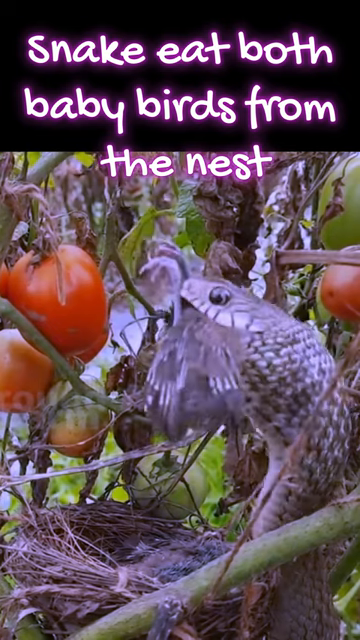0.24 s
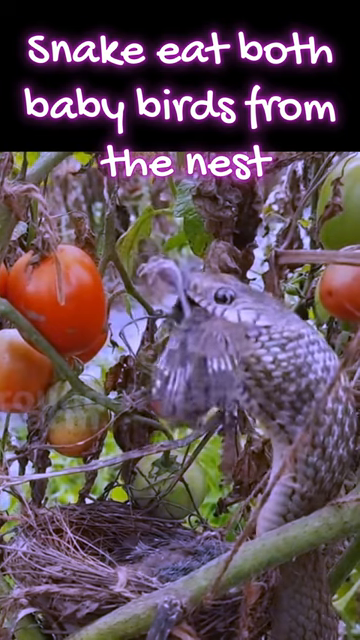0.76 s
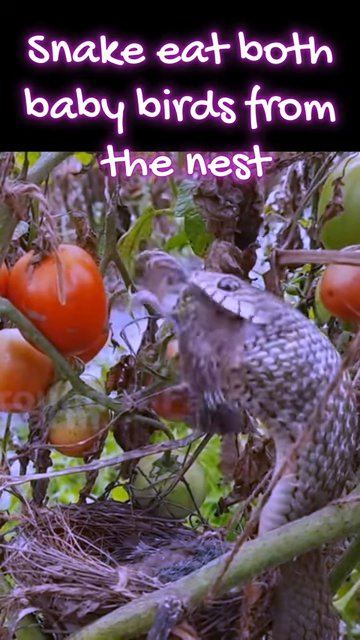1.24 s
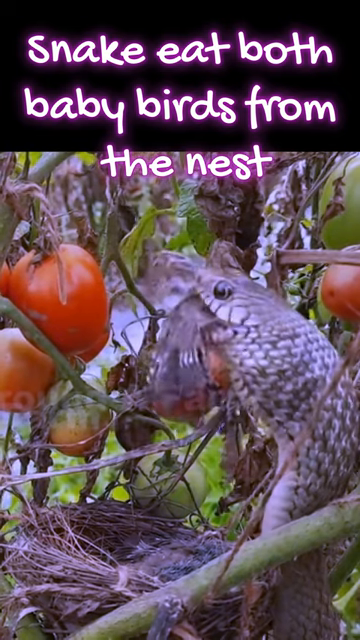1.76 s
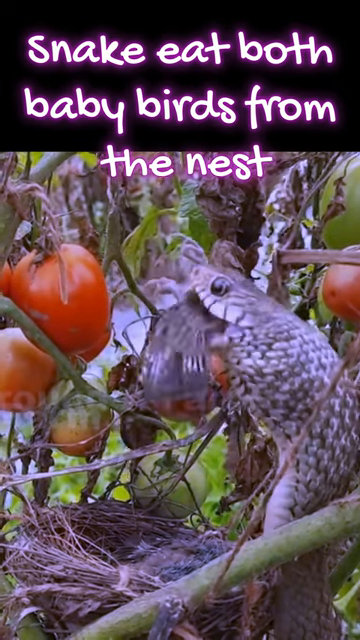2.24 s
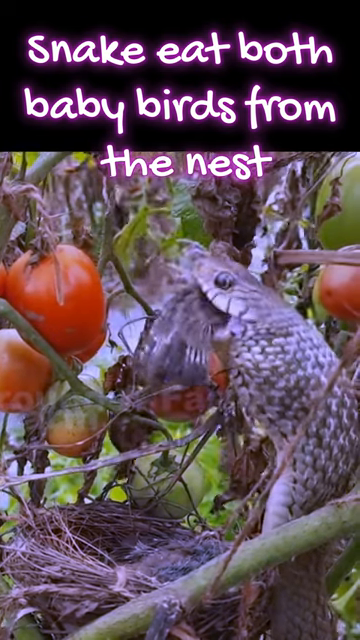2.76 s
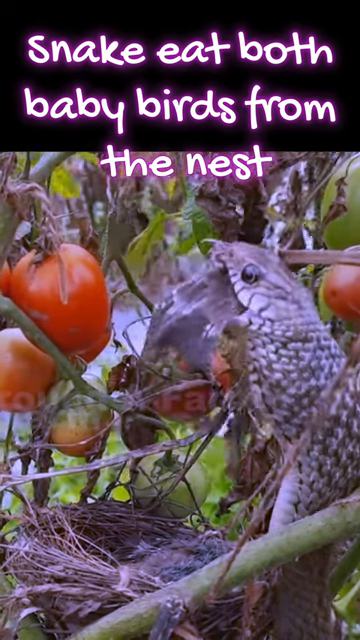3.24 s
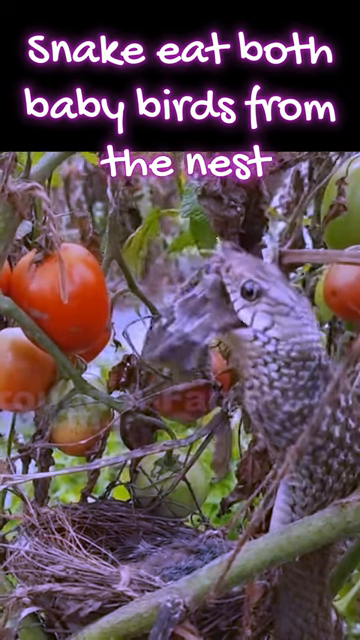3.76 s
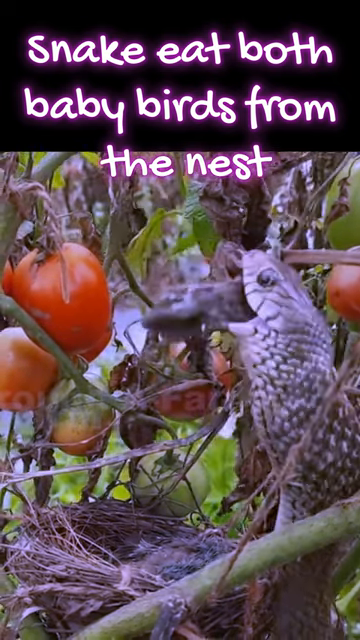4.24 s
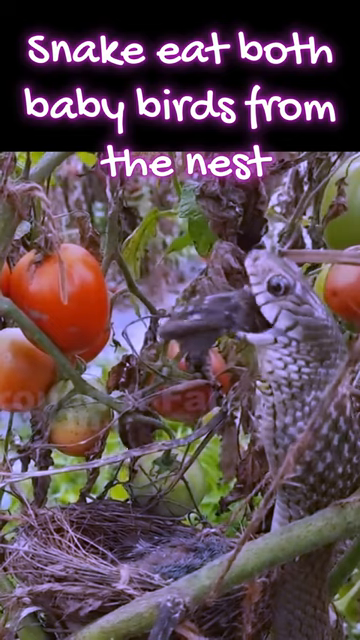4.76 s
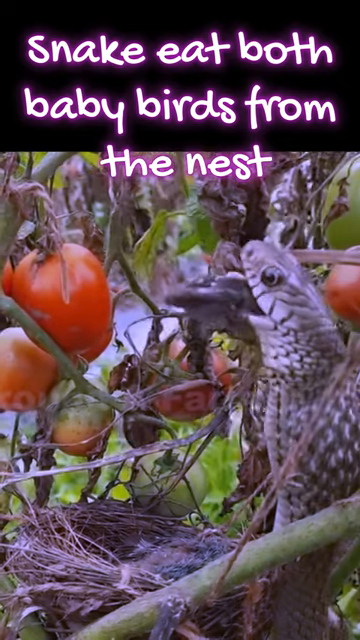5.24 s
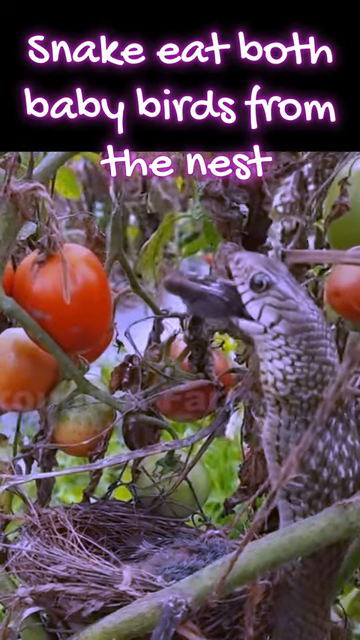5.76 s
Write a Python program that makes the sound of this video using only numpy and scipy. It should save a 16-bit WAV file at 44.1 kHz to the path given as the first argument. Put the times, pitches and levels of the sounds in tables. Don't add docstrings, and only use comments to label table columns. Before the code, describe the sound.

Outdoors, sharp high bird chips repeat in rapid bursts above a constant deep engine hum, faint road rumble and a brief leaf rustle.

```python
import sys
import numpy as np
from scipy import signal
from scipy.fft import rfft, irfft, next_fast_len
from scipy.io import wavfile

SR = 44100
rng = np.random.default_rng(int(sys.argv[2]) if len(sys.argv) > 2 else 0)


def boost_factor(decibels):
    exponent = np.asarray(decibels, float) / 20
    return 10 ** exponent


def master_out(mix):
    frames = np.transpose(np.atleast_2d(mix))
    ceiling = np.clip(frames, -1, 1)
    pcm = np.round(ceiling * 32767).astype(np.int16)
    wavfile.write(sys.argv[1], SR, pcm)


N = 264732


def rms_one(x):
    return x / np.sqrt(np.mean(x ** 2) + 1e-20)


def in_time(rows):
    s, *columns = np.transpose(rows)
    return [np.interp(np.arange(N) / SR, s, c) for c in columns]


def at_hz(points, hz):
    hz_points, values = np.array(points)[:, 0], np.array(points)[:, 1]
    return np.interp(np.log(hz), np.log(hz_points), values)


def drift(rate):
    r = np.exp(-80 * np.pi * rate / SR)
    coarse = rng.standard_normal(N // 40 + 2002)
    slow = signal.lfilter([1], [1, -2 * r, r * r], coarse)[2000:]
    return np.interp(np.arange(N) / 40, np.arange(len(slow)), rms_one(slow))


def swells(rows, rest_db):
    t = np.arange(0, N + 40, 40) / SR
    bells = sum(boost_factor(db) * np.exp(-((t - s) / half) ** 2) for s, db, half in rows)
    return np.interp(np.arange(N) / SR, t, boost_factor(rest_db) + bells)


def resonance(x, hz, width_hz):
    r = np.exp(-np.pi * width_hz / SR)
    poles = [1, -2 * r * np.cos(2 * np.pi * hz / SR), r * r]
    return signal.lfilter([(1 - r * r) / 2, 0, (r * r - 1) / 2], poles, x)


def left_port(x):
    # (frequency [Hz], phase [rad])
    port_phase = [(0, 0), (520, 0.6), (950, 2.3), (1380, 2.3), (1980, 4.2), (3100, 3.9), (5250, 4.0),
                  (5770, 5.1), (6720, 2.9), (7490, 2.9), (8440, 4.6), (9390, 9.3), (9990, 9.5),
                  (15700, 9.4)]
    size = next_fast_len(N)
    hz, lead = np.transpose(port_phase)
    shift = np.interp(np.arange(size // 2 + 1) * SR / size, hz, lead)
    return irfft(rfft(x, size) * np.exp(1j * shift), size)[:N]


def banded_noise(colour, patchy_db, fast_rate, grain=1):
    # (frequency [Hz], shared power [0-1])
    likeness = [(60, 1), (200, 0.93), (500, 0.54), (1000, 0.85), (2000, 0), (4000, 0.06), (8000, 0.23),
                (16000, 0.03)]
    # (frequency [Hz], left minus right [dB])
    port_balance = [(60, -8), (110, 9), (200, -0.5), (380, 1), (700, -2.5), (1290, -2), (2380, -2.5),
                    (4400, -4.5), (8120, 0), (15000, 3)]
    out, together = np.zeros((2, N)), drift(6.2)
    octaves = np.log2(colour[-1][0] / colour[0][0])
    edges = colour[0][0] * 2 ** np.arange(0, octaves + 1 / 3, 1 / 3)
    white = rng.standard_normal((2, 3, N)) * grain
    white = np.array([[left_port(common), common, left, right] for common, left, right in white])
    for k, (low, high) in enumerate(zip(edges, edges[1:])):
        band_pass = signal.butter(2, [low, high], "band", fs=SR, output="sos")
        band = signal.sosfilt(band_pass, white[k % 2])
        hz = np.sqrt(low * high)
        alike = np.clip(at_hz(likeness, hz), 0, 1)
        gain = boost_factor(at_hz(colour, hz) + patchy_db * (together + drift(fast_rate)))
        sides = boost_factor(at_hz(port_balance, hz) * np.array([[.5], [-.5]]))
        out += gain * sides * (np.sqrt(alike) * band[:2] + np.sqrt(1 - alike) * band[2:])
    return rms_one(out)


def bird():
    # (time [s], length [s], top of 2nd harmonic [Hz], level [dB], rise over fall [dB])
    chips = [(0.818, 0.014, 3050, -25, 0), (1.243, 0.015, 3050, -28, 0), (1.458, 0.012, 3180, -29, 3),
             (1.779, 0.018, 3100, -29.5, 5), (2.506, 0.014, 3040, -24, 0), (2.960, 0.013, 3100, -23, 1),
             (3.071, 0.015, 3200, -26.5, 0), (3.466, 0.013, 3090, -29, 0), (4.097, 0.011, 2800, -28, -1),
             (4.455, 0.014, 3010, -26, 3), (4.865, 0.017, 3450, -28, 2), (4.979, 0.016, 3470, -27.5, 3),
             (5.464, 0.013, 3320, -33, -2), (5.558, 0.015, 3190, -30.5, 2)]
    # (time [s], length [s], top of 2nd harmonic [Hz], level [dB], rise over fall [dB])
    chirps = [(0.876, 0.024, 3330, -29.5, 1), (0.942, 0.027, 3350, -29, -4), (1.043, 0.023, 3220, -28.5, 1),
              (1.847, 0.021, 3270, -27, 2), (1.911, 0.025, 3300, -27.5, 0), (1.970, 0.026, 3290, -30, -2),
              (2.574, 0.023, 3370, -24.5, 0), (2.653, 0.022, 3200, -28.5, 1),
              (3.124, 0.029, 3480, -26.5, 0), (3.206, 0.027, 3290, -27, -2), (4.158, 0.023, 3300, -30, 3),
              (4.218, 0.027, 3250, -28.5, 0), (4.283, 0.026, 3190, -28.5, 3),
              (4.580, 0.018, 3280, -30.5, 1), (4.685, 0.018, 3360, -30.5, 3), (5.044, 0.024, 3430, -30, 3),
              (5.183, 0.020, 3500, -31, 2)]
    # (time [s], peak [dB], pitch [Hz])
    lead_ins = [(1.237, -32.5, 2040), (2.499, -33.5, 2000), (2.956, -36.5, 2040), (3.459, -31.5, 2120),
                (4.091, -33.5, 2060), (4.574, -33.5, 2220), (4.859, -38.5, 2400), (4.976, -34.5, 2160),
                (5.180, -35.5, 2080), (5.455, -27.5, 2170), (5.552, -31.5, 1990)]
    # (frequency of a harmonic [Hz], gain [dB])
    throat = [(1150, -24), (1450, -14), (1720, -9), (2100, -10), (2500, -6), (2850, 0), (3050, 0),
              (3250, -4.5), (3500, -8), (4000, -22), (4500, -18), (5200, -29)]
    start_hz, end_hz, arch_power = 2640, 2400, 2.5
    run_up_s, edge_s, lead_in_s = .0045, .002, .0085
    voice_db, third_db, dip_db_per_s = 3.5, -3.5, 230
    voice = np.zeros(N)
    hoarse, waver = boost_factor(3.6 * drift(300)), 1 + .018 * drift(300)
    for s, length, top_hz, level_db, lean_db in chips + chirps:
        first_db = -15 + 14 * (top_hz / 1e3 - 3.25) + .3 * (length * 1e3 - 19)
        u = np.linspace(-1 - 2 * run_up_s / length, 1, round((length + run_up_s) * SR))
        begin = round((s - run_up_s) * SR)
        here = slice(begin, begin + len(u))
        foot_hz = np.where(u < 0, start_hz, end_hz)
        bend = np.minimum(np.abs(u), 1.1) ** arch_power
        pitch = (top_hz - (top_hz - foot_hz) * bend) / 2 * waver[here]
        phase = 2 * np.pi * np.cumsum(pitch) / SR
        first, second, third = (boost_factor(at_hz(throat, k * pitch)) for k in (1, 2, 3))
        upper = second * np.sin(2 * phase) + boost_factor(third_db) * third * np.sin(3 * phase)
        upper = upper / np.sqrt(np.mean(second ** 2))
        first_shape = rms_one(first * np.clip(1 - (u + .2) ** 2, 0, 1))
        stack = upper * hoarse[here] + boost_factor(first_db + 3.0) * first_shape * np.sin(phase)
        fall = (1 - u) * length / edge_s
        rise = (u - u[0]) * length / (2 * run_up_s + 1.5 * edge_s)
        edge = np.clip(np.minimum(fall, rise), 0, 1) ** 1.7
        dip_db = dip_db_per_s * length * (1.5 - np.minimum(u * u, 1))
        voice[here] += boost_factor(voice_db + level_db - lean_db * u - dip_db) * edge * stack
    for s, level_db, hz in lead_ins:
        u = np.linspace(0, 1, round(lead_in_s * SR))
        here = slice(round(s * SR), round(s * SR) + len(u))
        phase = 2 * np.pi * np.cumsum(hz * (.96 + 0.079 * u) * waver[here]) / SR
        voice[here] += boost_factor(level_db) * np.sin(np.pi * u) ** .6 * np.sin(phase) * hoarse[here]
    return voice


def garden(voice):
    # (delay [s], left level [dB], right level [dB])
    echoes = [
        (.0022, -17, -12),
        (.0048, -18, -13),
        (.011, -19, -15),
        (.017, -19, -16),
        (.023, -21, -19),
        (.031, -22, -20),
    ]
    low = signal.sosfiltfilt(signal.butter(4, 2200, fs=SR, output="sos"), voice)
    left = voice * boost_factor(-4.5) + low * boost_factor(-7)
    out = np.array([np.roll(left, -9), voice])
    for k, (delay, left_db, right_db) in enumerate(echoes):
        lag = round(delay * SR)
        swayed = voice * boost_factor(2.5 * drift(5.2))
        sides = boost_factor(np.array([[left_db], [right_db]]))
        out[:, lag:] += sides * swayed[:-lag] * [[(-1) ** k], [1]]
    t = np.arange(SR // 5) / SR
    decay = boost_factor(-60 * t / .11)
    scatter = rng.standard_normal((2, len(t))) * decay * np.clip(t / .003, 0, 1)
    return out + boost_factor(-35) * signal.fftconvolve(scatter, voice[None], axes=1)[:, :N]


def motor():
    # (time [s], firing rate [Hz], level [dB], load [-1.3..1])
    motor_course = [(0, 62.85, -24, 0.017), (.35, 61.6, -21, -1.3), (.7, 62.36, -21, -0.71),
                    (1.05, 62.7, -21.5, -0.14), (1.35, 62.14, -23.5, 0.67), (1.7, 62.83, -23.5, -0.27),
                    (1.95, 62.66, -23, -0.054), (2.4, 62.74, -20.5, -0.92), (2.7, 62.5, -24, 0.36),
                    (2.9, 62.65, -24, -0.22), (3.15, 61.2, -23, -0.053), (3.5, 63.1, -22.5, 0.45),
                    (3.9, 62.27, -24.5, 0.52), (4.3, 62.8, -27, 1), (4.85, 62.9, -24, 0.8),
                    (5.15, 63.13, -27, 1), (5.5, 63.2, -27, 1), (6, 62.6, -28, 0.12)]
    # (level re motor [dB], change per load [dB], waver [dB])
    orders = [
        (0, 1.5, 0.27),
        (-20, 2.5, 0),
        (-29, 13.5, 3),
        (-32, -6.5, 4),
    ]
    order_phase = [0, 1.9, .6, -1.5]
    # (time [s], peak [dB], half length [s])
    pipe_swells = [
        (.05, -2, 0.21),
        (.5, -5, 0.076),
        (1.15, -10, 0.26),
        (2.1, -23, 0.12),
        (3.28, -3.5, 0.11),
        (3.8, 2, 0.2),
        (4.3, 5, 0.096),
        (4.7, -10, 0.15),
        (5.85, 0.5, 0.35),
    ]
    # (time [s], peak [dB], half length [s])
    upper_swells = [
        (5.72, -50, .22),
    ]
    rate, level_db, load = in_time(motor_course)
    phase = 2 * np.pi * np.cumsum(rate) / SR
    lag, side_db = np.array([[-.14], [.14]]), np.array([[.35], [-.35]])
    out = np.zeros((2, N))
    for k, (order_db, load_db, waver_db) in enumerate(orders):
        gain = boost_factor(level_db + order_db + load_db * load + side_db + waver_db * drift(2.2))
        if k == 1:
            gain = gain * swells(pipe_swells, rest_db=0)
        out += np.sqrt(2) * gain * np.cos((k + 1) * phase + order_phase[k] + lag)
    upper = np.cos(5 * phase) * boost_factor(2.0 * drift(4)) + np.cos(6 * phase) * boost_factor(2.0 * drift(4))
    return out + swells(upper_swells, rest_db=-64) * upper


def lorry():
    # (time [s], peak [dB], half length [s])
    lorry_passes = [
        (1.62, -55, .12),
        (1.9, -43, 0.26),
        (2.15, -48, 0.11),
        (5.5, -52, 0.081),
        (5.68, -44.5, 0.17),
        (.3, -63, 0.27),
    ]
    hz, width_hz = 509, 160
    drone = rms_one(resonance(resonance(rng.standard_normal(N), hz, width_hz), hz, width_hz))
    return swells(lorry_passes, rest_db=-71) * np.array([left_port(drone) * boost_factor(-3.0), drone])


def traffic():
    # (time [s], level [dB])
    roar_course = [(0, -43), (.12, -42.5), (.5, -43.5), (.68, -43), (.8, -43), (1.42, -47), (1.6, -44.5),
                   (2.1, -42.5), (2.33, -42), (2.52, -42.5), (3.01, -45), (3.21, -43), (3.46, -42),
                   (3.74, -45.5), (5.1, -47.5), (5.35, -44.5), (5.6, -46), (6, -47.5)]
    # (frequency [Hz], density [dB per Hz])
    roar_colour = [(25, -14), (45, -6.5), (90, -3), (160, -11), (250, -11), (400, -11.5), (600, -16.5),
                   (900, -30)]
    # (frequency [Hz], density [dB per Hz])
    tyre_colour = [(450, 8), (600, -2), (900, 5), (1300, -11)]
    # (time [s], peak [dB], half length [s])
    tyre_passes = [(.12, -45.5, 0.25), (.42, -44.5, 0.22), (.66, -40, 0.12), (.92, -47, 0.069),
                   (1.4, -48, 0.2), (1.62, -43, 0.041), (2.25, -43.5, 0.25), (2.8, -68, 0.097),
                   (3.2, -40.5, 0.074), (3.45, -47.5, 0.15), (3.98, -54, 0.19), (5.1, -76, .06),
                   (5.5, -53, 0.071), (5.74, -44.5, 0.17), (5.96, -45, 0.22)]
    # (time [s], peak [dB], half length [s])
    boom_swells = [(.1, -18.5, 0.045), (.5, -18, 0.082), (.78, -18.5, 0.035), (.97, -24, 0.05),
                   (1.4, -29, 0.13), (2.2, -52, 0.13), (2.52, -52, 0.051), (2.69, -24, 0.074),
                   (3.12, -33, 0.049), (3.4, -32, 0.17), (3.74, -30.5, 0.16), (1.5, -42, 3.5)]
    roar_db, = in_time(roar_course)
    boom = rms_one(resonance(resonance(rng.standard_normal(N), 247.0, 40), 247.0, 40))
    low = banded_noise(roar_colour[:5], patchy_db=1.5, fast_rate=3.7)
    tyres = swells(tyre_passes, rest_db=-76) * banded_noise(tyre_colour, patchy_db=2, fast_rate=17)
    roar = boost_factor(roar_db + 2.5) * banded_noise(roar_colour[3:], patchy_db=1.0, fast_rate=29.0)
    return tyres + roar + boost_factor(-39.5) * low + boost_factor(-18) * swells(boom_swells, rest_db=-62) * boom


def foliage():
    # (time [s], dry rustle level [dB])
    gust = [(0, -62), (.13, -53), (.27, -59), (1, -56), (1.4, -60.5), (1.8, -57), (2, -51.5), (2.15, -53.5),
            (2.3, -49.5), (2.39, -47), (2.62, -42), (2.75, -46), (2.95, -48), (3.24, -46), (3.4, -51),
            (3.74, -53.5), (4.06, -54), (4.13, -49.5), (4.3, -54), (4.6, -52), (4.85, -57.5), (5.2, -55.5),
            (5.5, -58), (6, -58)]
    # (frequency [Hz], density [dB per Hz])
    rustle_colour = [(2500, -15), (4500, 15), (7000, 8.5), (10000, 11.5), (13000, 2), (15000, 12),
                     (17000, -20)]
    # (frequency [Hz], density [dB per Hz])
    hiss_colour = [(530, -10.5), (900, 4), (1150, -3), (1570, 3.5), (2040, 1), (2760, 7), (3150, -2),
                   (3550, -3), (4910, -5.5), (6640, -26.5), (8550, -3.5), (10500, -36.5), (14500, -9),
                   (16000, -44)]
    # (time [s], peak re hiss [dB], half length [s])
    hiss_swells = [
        (5.75, -12.5, 0.23),
    ]
    # (time [s], peak [dB], half length [s])
    far_gust = [
        (1.95, -49, 0.17),
        (2.2, -52, 0.2),
    ]
    rustle_db, = in_time(gust)
    hiss_db = -38.5 - 1.0 * np.arange(N) / SR + 0.16 * (rustle_db - rustle_db.mean())
    grain = boost_factor(0.46 * np.minimum(rng.exponential(1, N), 5) + 2.0 * drift(25))
    leaves = banded_noise(rustle_colour, patchy_db=.5, fast_rate=12, grain=grain)
    dull = signal.sosfilt(signal.butter(4, 6100, fs=SR, output="sos"), leaves[:, ::-1])
    rustle = boost_factor(rustle_db) * leaves + swells(far_gust, rest_db=-63) * dull
    insect_hz, insect_width_hz, insect_db = 8320, 710, -63.5
    insects = resonance(rng.standard_normal((2, N)), insect_hz, insect_width_hz)
    insects = rms_one(resonance(insects, insect_hz, insect_width_hz))
    hiss = banded_noise(hiss_colour, patchy_db=.6, fast_rate=10)
    hiss = boost_factor(hiss_db + 1) * swells(hiss_swells, rest_db=0) * hiss
    return hiss + rustle + boost_factor(insect_db + drift(3.8)) * insects


def scene():
    return garden(bird()) + motor() + traffic() + foliage() + lorry()


def low_pass(x):
    return signal.sosfilt(signal.butter(12, 15810, fs=SR, output="sos"), x)


def record(dry):
    mix = signal.sosfilt(signal.cheby2(12, 70, 16700, fs=SR, output="sos"), dry)
    return low_pass(mix)


dry = scene()
out = record(dry)
master_out(out)
```